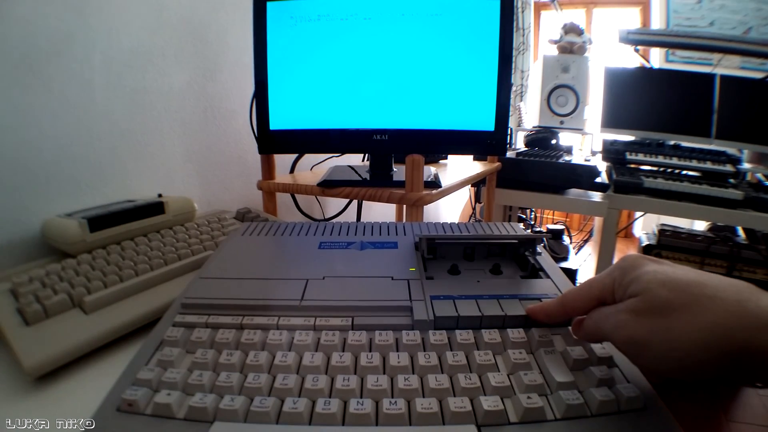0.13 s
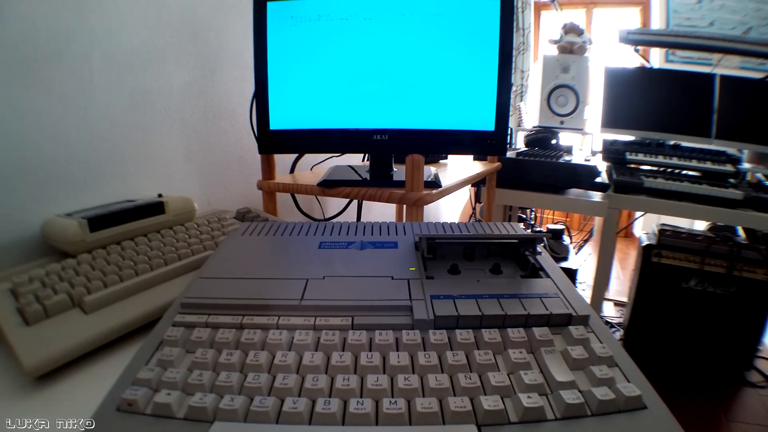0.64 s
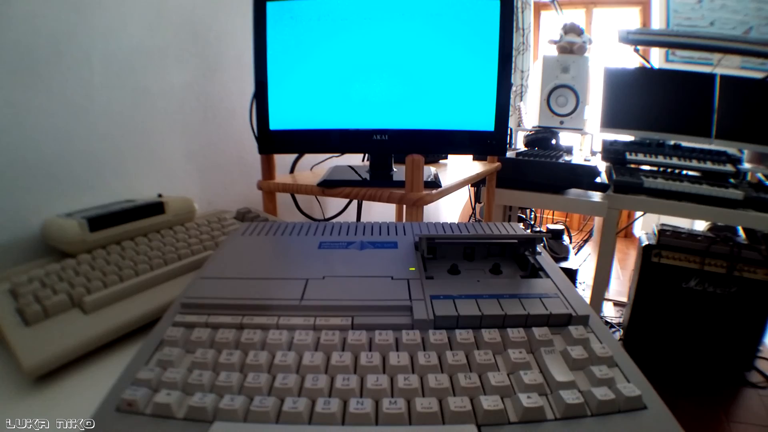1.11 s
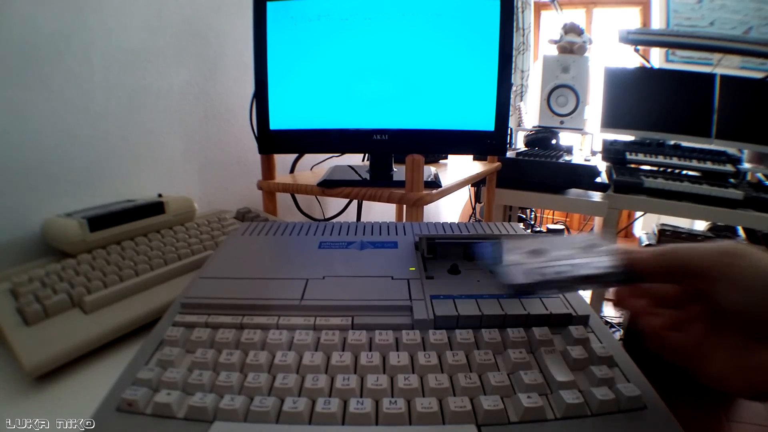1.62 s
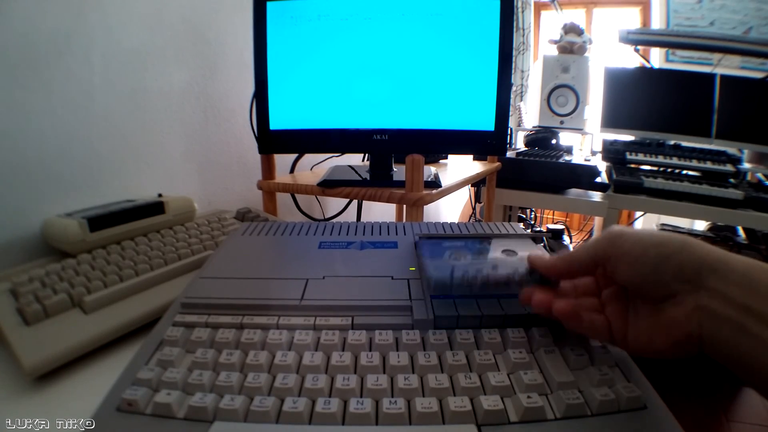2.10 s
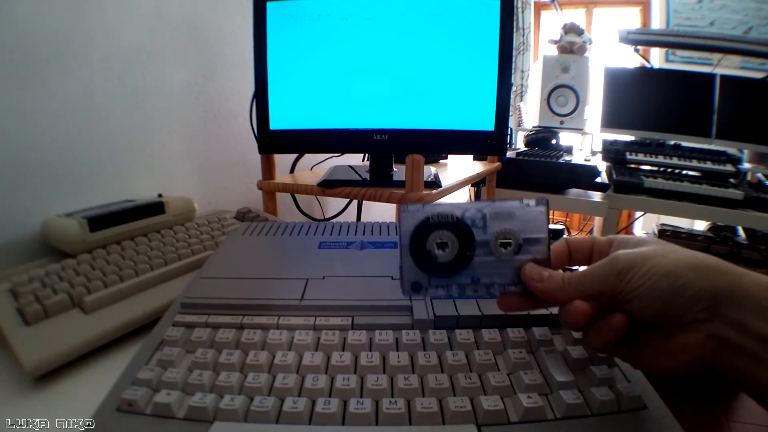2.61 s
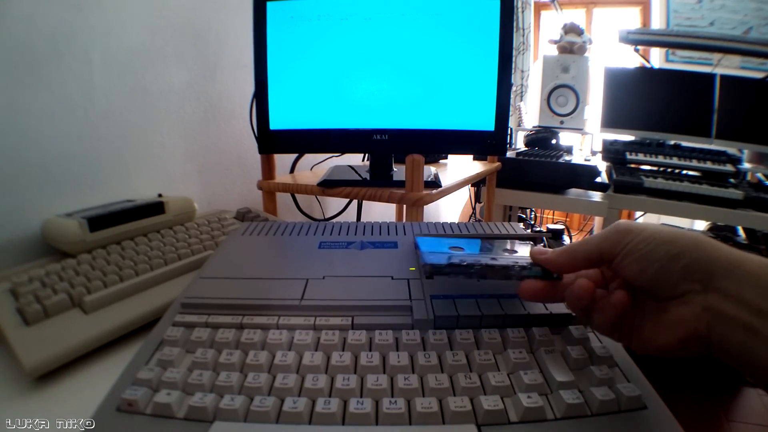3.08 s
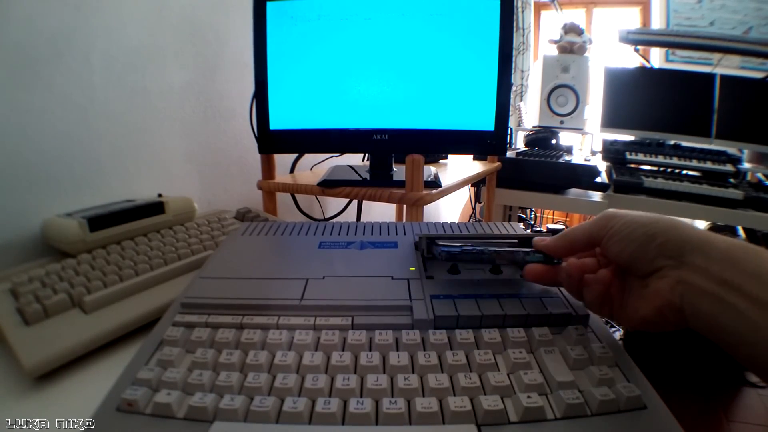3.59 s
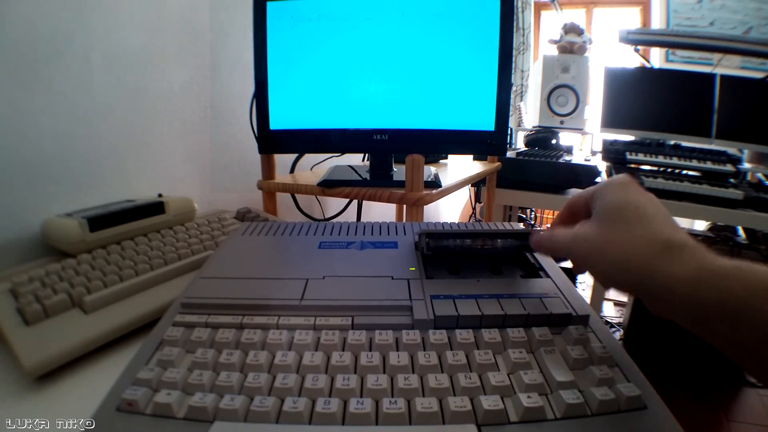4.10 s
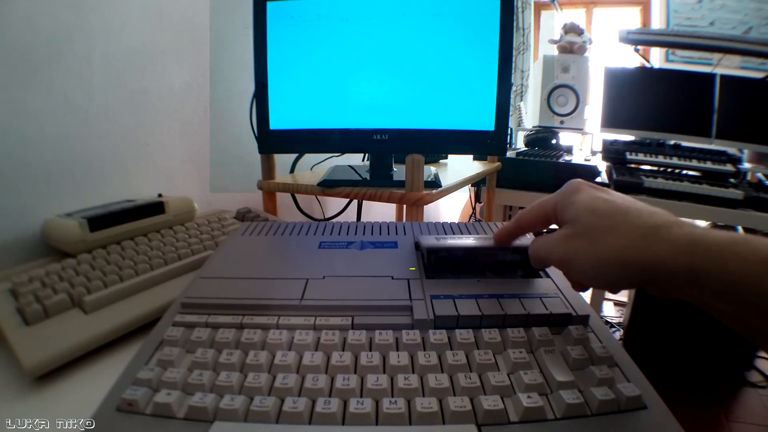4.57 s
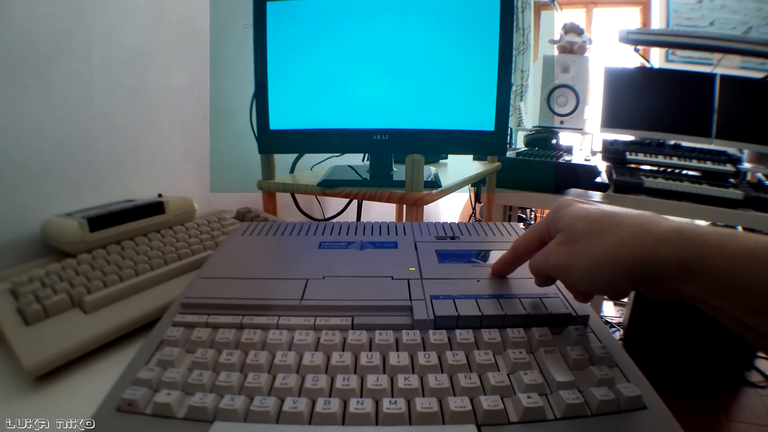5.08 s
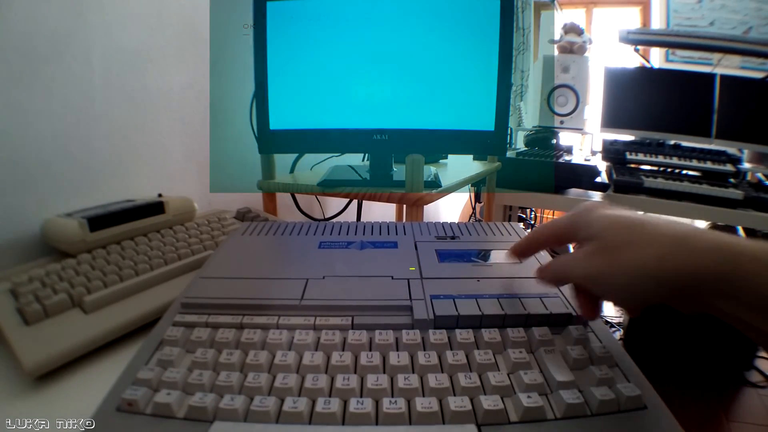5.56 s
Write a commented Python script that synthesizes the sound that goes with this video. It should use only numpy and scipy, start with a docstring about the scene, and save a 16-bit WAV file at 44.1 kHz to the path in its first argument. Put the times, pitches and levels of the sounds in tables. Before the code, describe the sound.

A hand loads a cassette into a tape deck built into an old computer. After one initial case knock come faint handling ticks, a bright burst of plastic clatter, a gap, then a cluster of hollow knocks and soft scuffs, and finally the loudest snap as the lid latches. Close microphones, dry contacts with a short room tail, low noise and a faint wavering high whistle.

```python
"""Close to a stereo microphone in a small quiet room, the case of a tape deck built into a computer knocks softly.
A hand takes a plastic cassette and turns it over, slides it into the tray and snaps the lid shut; faint knocks follow.
Each contact is a chatter of tiny noise bounces that rings resonant modes and is answered by a decaying room tail.
Clean taps are short decaying sines. Filtered noise hisses and a thin wavering sine whistles throughout."""
import sys
import numpy as np
from scipy import signal
from scipy.fft import rfft, irfft
from scipy.io import wavfile
from scipy.ndimage import uniform_filter1d, map_coordinates

SR = 44100
rng = np.random.default_rng(int(sys.argv[2]) if len(sys.argv) > 2 else 0)


def rack_gain(trim_db):
    """Turn a fader trim in dB into the linear factor to multiply a signal by."""
    fader = np.asarray(trim_db, float)
    return 10 ** (fader / 20)


def wav_out(sig):
    """Save sig, one row per channel (or a flat mono array), as 16-bit PCM at SR to the path in sys.argv[1]."""
    wavfile.write(sys.argv[1], SR, np.round(np.clip(np.atleast_2d(sig).T, -1, 1) * 32767).astype(np.int16))


N = 251370  # samples in the scene
SPAN = 24000  # samples of chatter, and of room tail, computed for one contact

# resonances of the deck's case and tray: centre f/Hz, bandwidth/Hz, relative level/dB
CASE_MODES = [(109, 8.8, 0), (160, 15, -4), (232, 39, -3.5), (290.8, 26, 4.5), (385.6, 24, 1.5),
              (452, 62, 3.5), (509, 50, -1.5), (580, 13, 1.5), (801, 36, 2), (880, 61, 2), (996, 57, 1),
              (1400, 250, 3), (1580, 194, -6.5), (1830, 54, 6), (2142, 140, -10), (2480, 140, 2.5),
              (2796, 410, -4), (3220, 83, 8), (4450, 200, -9), (4760, 550, 1.5), (5420, 130, 9),
              (6070, 280, 13), (6680, 150, 2.5), (7740, 500, -12), (9160, 370, -3.5), (9730, 1100, 11),
              (11700, 480, 3.5), (12500, 880, -2)]


def along(points, hz):
    """Reads a curve of (Hz, value) points on a log frequency axis."""
    f, value = np.transpose(points)
    return np.interp(np.log(hz + 1), np.log(f + 1), value)


def unit(x):
    """Scales a signal to rms 1."""
    return x / np.sqrt(np.mean(x ** 2) + 1e-20)


def wobble(rate):
    """Draws a smooth random curve with rate knots a second."""
    knots = rng.standard_normal(int(N * rate / SR) + 4)
    return map_coordinates(knots, [np.arange(N) * rate / SR])


def pair(z, hz, alike):
    """Mixes two unrelated spectra into a left and right of the given likeness."""
    turn = (np.arccos(np.clip(along(alike, hz), -1, 1)) / 2)[:, None]
    shared, opposed = np.cos(turn) * z[0], np.sin(turn) * z[1]
    return np.array([shared + opposed, shared - opposed])


def causal(gain):
    """Gives a gain curve its minimum-phase response, so nothing sounds ahead of the blow."""
    cepstrum = irfft(np.log(gain + 1e-6))
    half = len(cepstrum) // 2
    return np.exp(rfft(np.r_[cepstrum[0], 2 * cepstrum[1:half], cepstrum[half], np.zeros(half - 1)]))


def coloured(rows, touch):
    """Turns weight and edge into a colour: a heavy contact pushes the bass, a sharp edge the treble."""
    hz, plain_db, heavy, sharp = np.transpose(touch)
    result = []
    for s, db, weight, edge, length in rows:
        colour_db = plain_db + heavy * weight + sharp * edge
        result.append((s, db, list(zip(hz, colour_db)), length))
    return result


def room():
    """Draws a fresh noise tail: each frequency dies at its own speed, and echoes take a few ms to build."""
    # decay: f/Hz, t60/s
    decay = [(100, 0.86), (250, 0.53), (700, 0.31), (3000, 0.42), (8000, 0.36), (14000, 0.28)]
    # left-right likeness of the tail: f/Hz, likeness (1 = identical)
    tail_alike = [(60, 1), (400, .85), (1000, .3), (2500, 0.068)]
    hz, t, z = signal.stft(rng.standard_normal((2, SPAN)), SR, nperseg=256)
    fade = rack_gain(-60 * t / along(decay, hz)[:, None])
    tail = signal.istft(pair(z, hz, tail_alike) * fade, SR, nperseg=256)[1][:, :SPAN]
    build_s = 0.0059
    tail = tail * (1 - np.exp(-(np.arange(SPAN) / SR / build_s) ** 2))
    return rfft(tail / np.linalg.norm(tail[0]), 2 * SPAN)


def contacts(rows, modes, low_hz, click_db, spiky_db, pan_db, wet_db, rise):
    """Each contact chatters, rings the modes at new strengths and reaches the two capsules differently.
    rows: (t/s, strength/dB, colour as (Hz, dB) points, chatter length/s); rise in s."""
    # strength of the echoes: f/Hz, level/dB
    echo_colour = [(100, 7), (300, 4), (900, -1), (3000, -1.5), (7000, -2), (13000, -3.5)]
    out = np.zeros((2, N + 3 * SPAN))
    t, hz = np.arange(SPAN) / SR, np.fft.rfftfreq(2 * SPAN, 1 / SR)
    centre, width, mode_db = np.transpose(modes)[:, :, None]
    ring = 1j * hz * width / (centre ** 2 - hz ** 2 + 1j * hz * width)
    click = rack_gain(click_db) * 1j * hz / (1j * hz + 220)  # the bare contact, weak in the bass
    # the room sums all directions, so it hears every mode at its mean strength
    power = np.sum(np.abs(rack_gain(mode_db) * ring) ** 2, axis=0) + np.abs(click) ** 2
    blurred = uniform_filter1d(power, size=1300)  # by the walls the high modes have died into a blur
    everywhere = np.sqrt(np.abs(np.where(hz < 1200, power, blurred))) * rack_gain(along(echo_colour, hz))
    too_small = hz ** 2 / (hz ** 2 + low_hz ** 2)  # a small object moves no deep bass
    for s, db, colour, length in rows:
        length = max(length, 3e-4)
        # dense tiny bounces of uneven size swell and then die away
        stroke = (1 - np.exp(-t / rise)) * np.exp(-(t / length) ** 1.15)
        unevenness = unit(uniform_filter1d(rng.standard_normal(SPAN), size=24))
        bounces = rng.standard_normal(SPAN) * rack_gain(spiky_db * unevenness) * stroke

        # a mode's phase differs between the capsules once its wavelength is short
        turn = rng.standard_normal((2, len(modes))) * np.clip(centre.T / 1800, 0, 1.4)
        strength = rack_gain(mode_db.T + rng.normal(0, 2.8, (2, len(modes))))
        strength = strength * np.exp(1j * turn) * (-1) ** np.arange(len(modes))

        # hard bounces drive all frequencies evenly; the contact point sets the colour
        blow = rfft(bounces, 2 * SPAN)
        even = np.sqrt(np.abs(uniform_filter1d(np.abs(blow) ** 2, size=200)))
        blow = blow * causal(rack_gain(along(colour, hz)) * too_small / even)
        near = (strength @ ring + click) * rack_gain([[pan_db], [-pan_db]])
        far = rack_gain(wet_db) * everywhere * room()
        sound = irfft(blow * (near + far))
        # a leading margin lets a contact begin before the scene does
        out[:, SPAN + round(s * SR):][:, :2 * SPAN] += rack_gain(db) * sound
    return out[:, SPAN:SPAN + N]


def cassette():
    """The loose shell creaks and its reels rattle in the hand, as chatters ringing the shell's modes."""
    # contacts in the hand: t/s, strength/dB, weight/dB, edge/dB, chatter length/s
    handling = [(0.836, -33, 0, -5, 0.012), (0.921, -36.5, -5, -4, .0022), (0.986, -40.5, 9, -2.5, 0.0014),
                (1.071, -33, 8, -6.5, .003), (1.12, -36, -11, -2, 0.019), (1.141, -19.5, -9, -7, 0.016),
                (1.247, -43.5, -4, 1, 0.0017), (1.296, -25, -14, -3, 0.012), (1.311, -37, -8, 2, .0049),
                (1.402, -37, -5, 3, 0.0046), (1.423, -20, 10, -15, 0.014), (1.437, -17.5, -20, 0.5, 0.0048),
                (1.619, -41, 13, 0.5, .0022), (1.652, -22, -14, -15, 0.0025), (1.658, -25.5, 11, -13, .008),
                (1.675, -29, -10, -12, 0.0096), (1.809, -40, 8, 0, 0.0016),
                (2.059, -19.5, -21, -15.5, 0.0023), (2.066, -34, -8, -13, .0053),
                (2.117, -19, 11, -13, 0.01), (2.1425, 0.5, 6, -4, 0.0066), (2.159, -2.5, 8.5, -13, 0.015),
                (2.1937, 2.5, -16, -10.5, 0.0051), (2.203, 1.5, 2.5, -8.5, 0.017),
                (2.216, 0, -4, -16, 0.013), (2.228, -7, -4, -5, 0.02), (2.251, -12, 3, -16, 0.0045),
                (2.29, -14.5, 6, -24, 0.0048), (3.009, -29, 0, -16, 0.0034), (3.041, -34, 6, -6.5, .0026),
                (3.095, -27.5, -11, -35, 0.0036), (3.189, -27, -10, -9, 0.0065),
                (3.2051, -8, -11.5, -22, .0034), (3.217, -18, 0, -10.5, 0.0073)]
    # resonances of the plastic shell: centre f/Hz, bandwidth/Hz, relative level/dB
    shell_modes = [(680, 70, -9.5), (856, 53, 7), (990, 120, -1), (1400, 530, 4.5), (1596, 320, 0),
                   (1850, 620, -1.5), (2460, 450, 1.5), (2890, 340, 6.5), (3440, 110, -1),
                   (4270, 920, -2.5), (5450, 1100, 3.5), (6190, 63, 7), (6280, 250, 6.5), (7000, 870, -1.5),
                   (9150, 180, 7), (10260, 1400, 7.5), (13500, 1200, -27)]
    # contact colour: f/Hz, plain level/dB, share of the weight [dB/dB], share of the edge [dB/dB]
    shell_touch = [(99, 4.5, 0.83, .01), (198, -4.5, 1.04, 0.011), (613, 1.2, 0.95, .01),
                   (1500, -0.7, 0.011, .01), (3000, 3.5, 0.0079, 0.95), (5600, 0, 0.012, 0.93),
                   (9800, -5, .01, 1.5)]
    return contacts(coloured(handling, shell_touch), shell_modes, low_hz=143, click_db=-7.0,
                    spiky_db=3.5, pan_db=0.1, wet_db=-10.5, rise=0.00031)


def tray():
    """Keys and tray knock the hollow case and ring its modes."""
    # knocks: t/s, strength/dB, weight/dB, edge/dB, chatter length/s
    loading = [(-.025, -3.5, 12, -15, .025), (0.255, -24.5, 2, -14.5, .009), (0.29, -28.5, 9.5, -24, .0098),
               (0.31, -27.5, 15, -18.5, .011), (0.325, -21.5, 11, -29, 0.014), (0.342, -28, -2, -20, .012),
               (0.625, -44, 12.5, 0, .015), (3.447, -7, 1.5, -14.5, .0071), (3.541, -7.5, 8.5, -11, .027),
               (3.56, -38, 25, -11, .0088), (3.683, -13.5, 12, -13.5, .015), (3.702, -23.5, 18, -7, .0058),
               (3.72, -23, 12, 1, .0075), (3.745, -20, 5.5, -6, .017), (3.758, -8, -1.5, -20, .012),
               (3.845, -29, 12.5, -4, .016), (3.871, -.4, -0.2, -14, .012), (3.885, -5.5, 2, -10, .01),
               (3.948, -6.5, -3, -11.5, .0097), (3.957, 1, -6.5, -21, .015), (4.012, -6.5, 7, -12, .026),
               (4.034, 7, 2, -9.5, .017), (4.05, -0.9, 4.5, -6.5, .019), (4.225, -21, 4, -10, .012),
               (4.245, -18, 3.5, -9.5, .012), (4.256, -17, 6.5, -28, .012), (4.57, -21, 7, -21.5, .013),
               (4.639, -27, 11, -6.5, .012), (4.652, -29.5, 16, -14.5, .019), (4.73, -23, 0.5, -16, .012),
               (4.744, -6, -12, -25, .0059), (4.75, 1, -4.5, -18.5, .012), (4.772, 2, 2.4, -14, .011),
               (5.535, -23, 10, -3.5, .012), (5.55, -42, -11, -5, .011)]
    # contact colour: f/Hz, plain level/dB, share of the weight [dB/dB], share of the edge [dB/dB]
    case_touch = [(100, 0.1, 1, .01), (248, -2.2, 1.07, .01), (750, 2.2, 0.69, .01), (2200, -0.5, .01, .01),
                  (5240, 2, .01, 0.79), (9900, -4.5, .01, 1.33)]
    return contacts(coloured(loading, case_touch), CASE_MODES, low_hz=92.0, click_db=-4.5,
                    spiky_db=4.0, pan_db=0.93, wet_db=-7.5, rise=0.00024)


def lid():
    """The lid touches, latches and slaps home, ringing its own modes."""
    # contacts: t/s, strength/dB, weight/dB, edge/dB, chatter length/s
    shutting = [(4.889, -2, 0.7, -16, 0.014), (4.9115, 10.5, 6.5, 5, .0031),
                (4.916, 9.5, -4.5, -6.5, 0.012)]
    # resonances of the lid: centre f/Hz, bandwidth/Hz, relative level/dB
    lid_modes = [(100, 24, -3.5), (257, 10, 0.5), (296, 21, 4), (394, 20, 3.5), (516, 82, 0.5),
                 (615, 25, 7), (780, 50, 0.5), (873, 35, 9), (1335, 110, -8.5), (2082, 71, 0.5),
                 (2870, 150, -5), (3350, 180, 2), (3500, 140, -2), (4117, 140, 0), (4970, 160, -4),
                 (5420, 150, -1), (5520, 63, 6), (6600, 160, -2.5), (7600, 360, -10), (8930, 440, 4.5),
                 (10500, 700, 3), (12300, 2600, -4.5)]
    # contact colour: f/Hz, plain level/dB, share of the weight [dB/dB], share of the edge [dB/dB]
    lid_touch = [(120, -2, 0.64, .01), (248, -3, .8, 0.011), (750, 2.5, 1, .01), (2200, 1.8, .01, .01),
                 (5400, 6, .01, .6), (10100, -4, .01, 1.5)]
    return contacts(coloured(shutting, lid_touch), lid_modes, low_hz=94.6, click_db=-10.0,
                    spiky_db=4.0, pan_db=1.3, wet_db=-7.5, rise=0.0015)


def scuffs():
    """The cassette rubs and rustles, in the hand and along its guides: slowly rising, less spiky chatter that
    rings the case."""
    # soft scuffs: t/s, strength/dB, weight/dB, chatter length/s
    sliding = [(.27, -33.5, 13.5, .053), (1.042, -26, -9, .048), (1.123, -27.5, -6, .046),
               (1.44, -32, 5, .045), (1.656, -30, 15, .029), (2.998, -43, 11.5, .088),
               (3.468, -18.5, 4, .042), (3.58, -22.5, 11, .16), (3.69, -18.5, 11, .068),
               (3.779, -22.5, 13, .065), (3.901, -19.5, 12, .05), (3.971, -13, 6.5, .045),
               (4.55, -29, 10, .048), (4.659, -24, 8.5, .1), (4.791, -16, 8.5, .089),
               (5.17, -35.5, 12, .038)]
    # contact colour: f/Hz, plain level/dB, share of the weight [dB/dB], share of the edge [dB/dB]
    scuff_touch = [(250, 0.1, 1.3, .01), (750, 3, 0.39, .01), (2200, -2, .01, .01), (5500, 5.5, .01, 1.01),
                   (10000, -5, .01, 1.01)]
    edge_db = -15.5  # a sliding contact is always blunt
    slides = [(s, db, weight, edge_db, length) for s, db, weight, length in sliding]
    return contacts(coloured(slides, scuff_touch), CASE_MODES, low_hz=85, click_db=-6.0,
                    spiky_db=2.0, pan_db=0.8, wet_db=-8.5, rise=0.054)


def tocks():
    """Single clean taps on a small hollow part: one short, dry mode each, equal in both channels."""
    # taps: t/s, level ahead of the soft onset/dB, f/Hz, t60/s
    taps = [(0.8405, -32, 1470, 0.0084), (1.295, -47, 2940, 0.017), (1.4365, -39, 4640, 0.017),
            (2.0595, -43.5, 2820, 0.016), (2.1954, -17.5, 2550, .011), (3.2042, -30.5, 1400, 0.0091),
            (3.759, -35.5, 1920, 0.038), (4.573, -45, 1000, 0.035)]
    out, t = np.zeros(N), np.arange(2000) / SR
    onset = 1 - np.exp(-t / 0.00058)
    for s, db, hz, t60 in taps:
        decay = rack_gain(db - 60 * t / t60)
        out[round(s * SR):][:len(t)] += decay * onset * np.sin(2 * np.pi * hz * t)
    return out


def hiss():
    """Room air and microphone noise: shaped noise whose overall level drifts a little."""
    # noise spectrum: f/Hz, relative density/dB
    spectrum = [(15, -46.5), (25, -0.5), (64, -23), (102, -7.5), (149, -10), (301, -4), (489, -11),
                (818, -10.5), (1700, -15), (1890, -13.5), (6740, -21), (7710, -27.5), (12500, -28.5),
                (13600, -37), (16000, -29)]
    # left-right likeness: f/Hz, likeness (1 = identical)
    hiss_alike = [(60, 0.21), (150, .3), (400, .28), (1000, .05), (3000, 0.011)]
    hz, t, z = signal.stft(rng.standard_normal((2, N + 4096)), SR, nperseg=2048)
    shaped = pair(z, hz, hiss_alike) * rack_gain(along(spectrum, hz))[:, None]
    noise = signal.istft(shaped, SR, nperseg=2048)[1][:, :N]
    level_db = -68.5 + 2.2 * wobble(1.4)
    return rack_gain(level_db) * unit(noise)


def whistle():
    """A faint, thin, fuzzy sine whose pitch wanders and level flickers, mostly on the left."""
    # path of the whistle: t/s, mean pitch f/Hz, mean left level/dB
    path = [(0, 6600, -80), (.25, 6150, -78), (.64, 6550, -77), (.66, 7700, -78), (1.4, 7400, -77),
            (2.4, 7450, -80), (3.0, 7900, -82), (4.44, 7700, -81), (4.46, 6900, -81), (5.15, 7500, -78),
            (5.7, 7700, -78)]
    s, hz, db = np.transpose(path)
    t = np.arange(N) / SR
    wander_hz, quiver_hz, fuzz_hz = 110 * wobble(6), 90 * wobble(20), 160 * wobble(500)
    pitch = np.interp(t, s, hz) + wander_hz + quiver_hz + fuzz_hz
    flicker_db = 3 * wobble(40)
    level_db = np.interp(t, s, db) + flicker_db + [[0], [-14]]  # left, right
    return rack_gain(level_db) * np.sin(2 * np.pi * np.cumsum(pitch) / SR)


def scene():
    """Sums everything at the microphone."""
    deck = tray() + lid() + scuffs()
    return cassette() + deck + tocks() + hiss() + whistle()


def top_cut(x):
    """Nothing passes above the cut-off."""
    return signal.sosfilt(signal.butter(12, 17150, fs=SR, output="sos"), x)


def record(dry):
    """The right capsule hears two samples first; the converter adds a band limit and a small offset."""
    low_pass = signal.butter(10, 16600, fs=SR, output="sos")
    capsules = np.array([np.roll(dry[0], 2), dry[1]])
    heard = signal.sosfilt(low_pass, capsules) - 3e-4
    return top_cut(heard)


dry = scene()
out = record(dry)
wav_out(out)
```